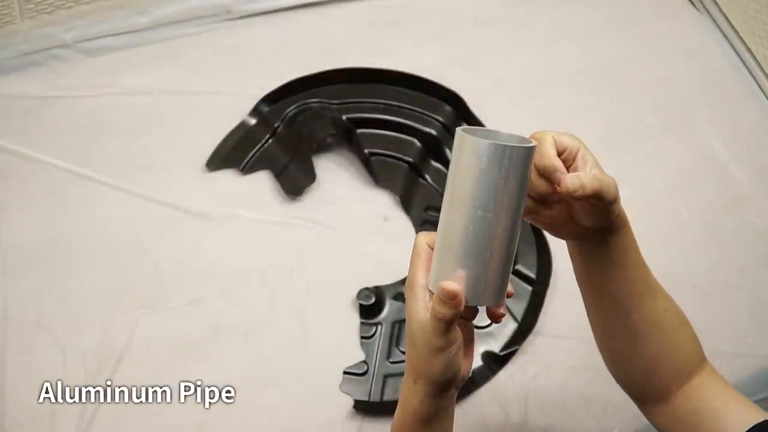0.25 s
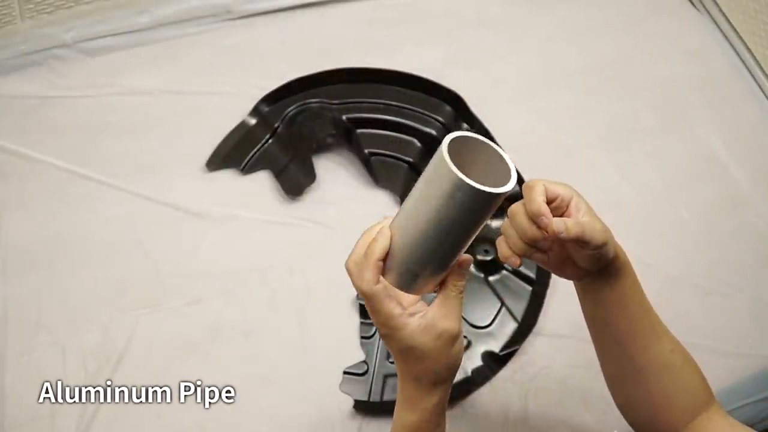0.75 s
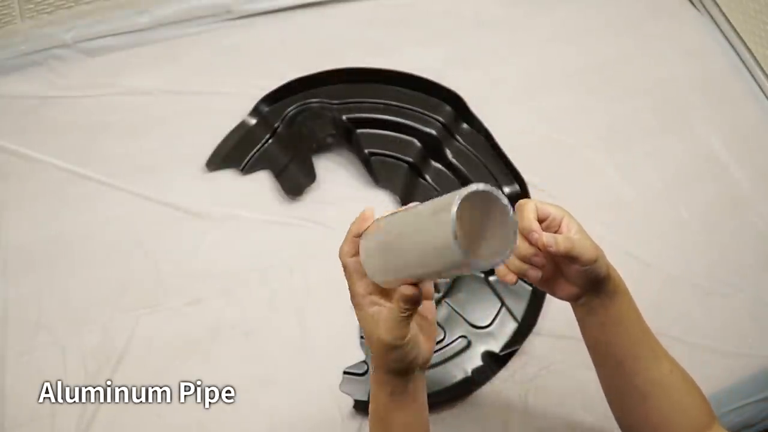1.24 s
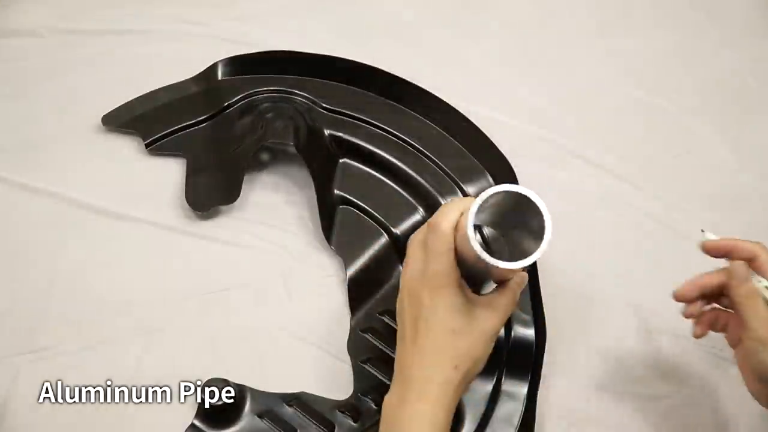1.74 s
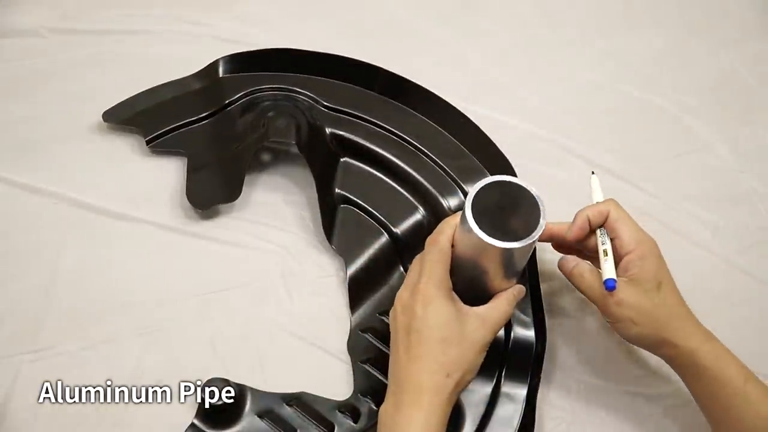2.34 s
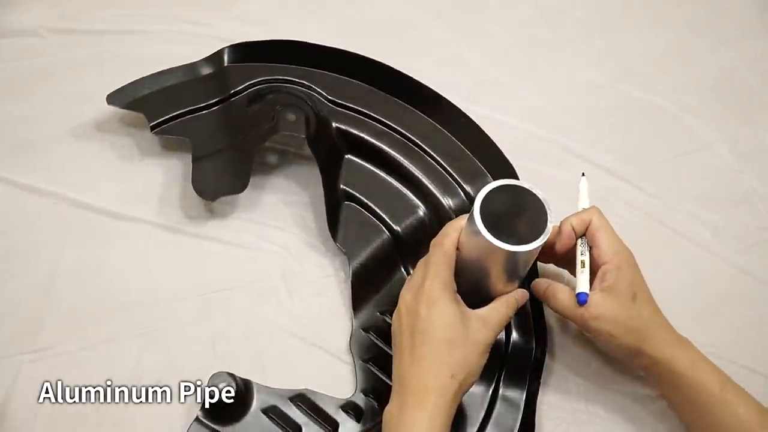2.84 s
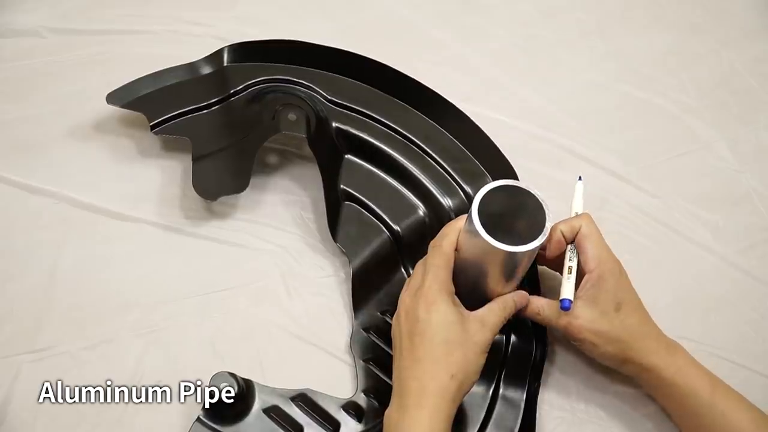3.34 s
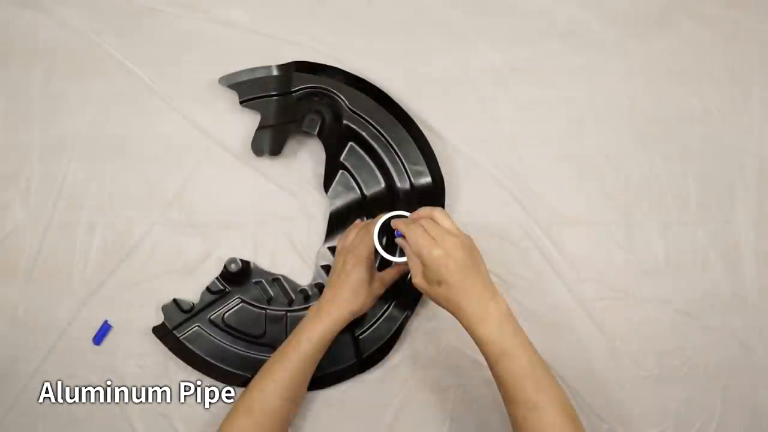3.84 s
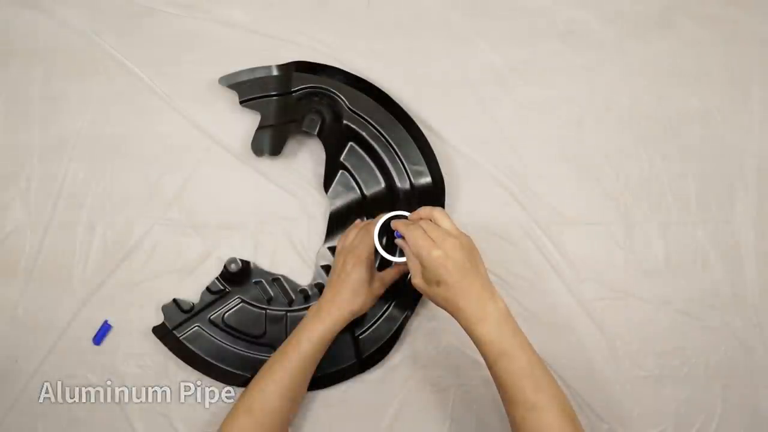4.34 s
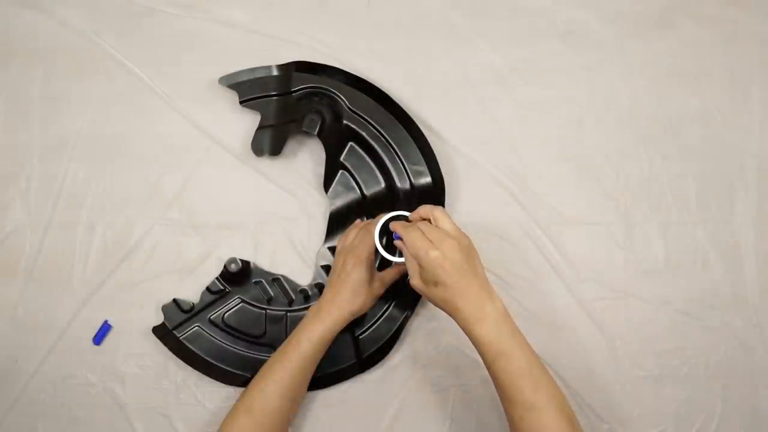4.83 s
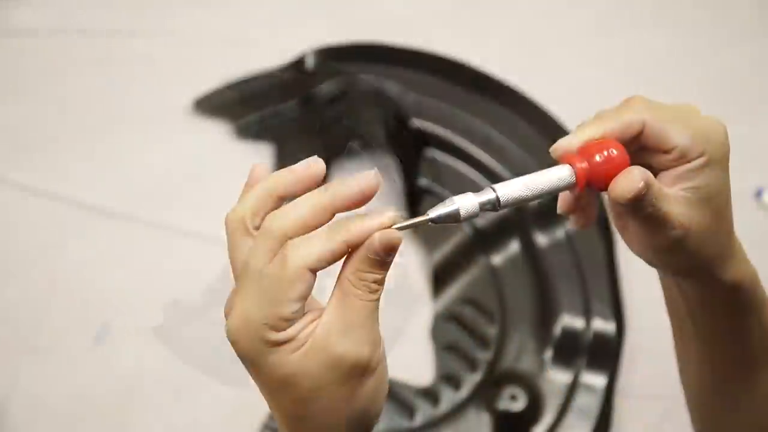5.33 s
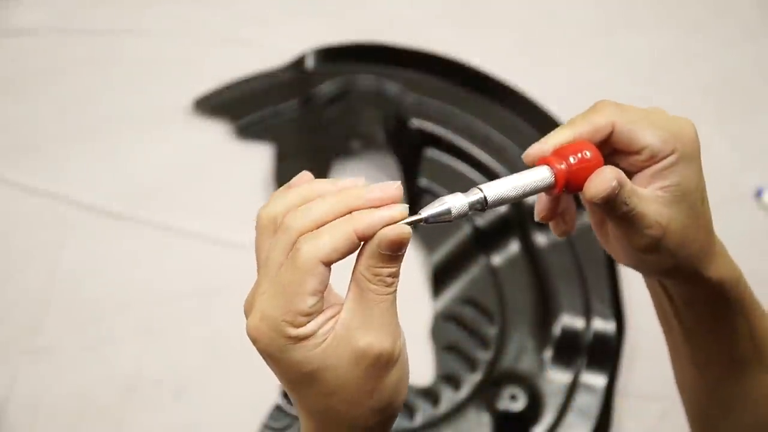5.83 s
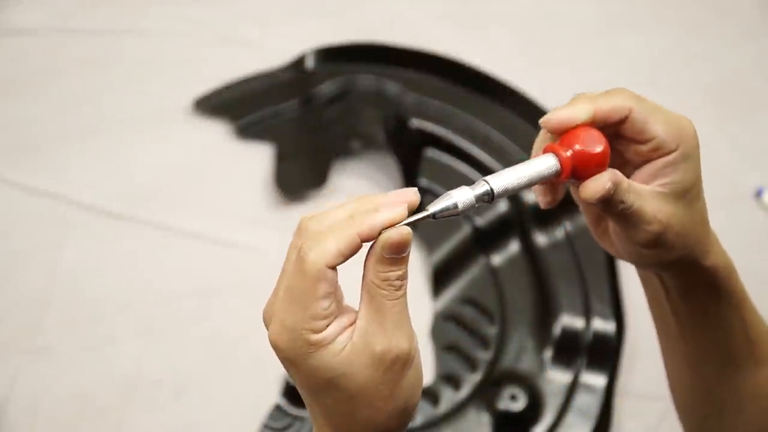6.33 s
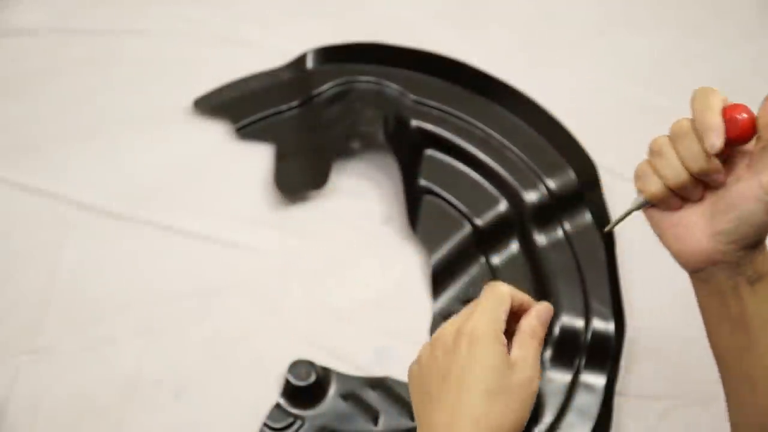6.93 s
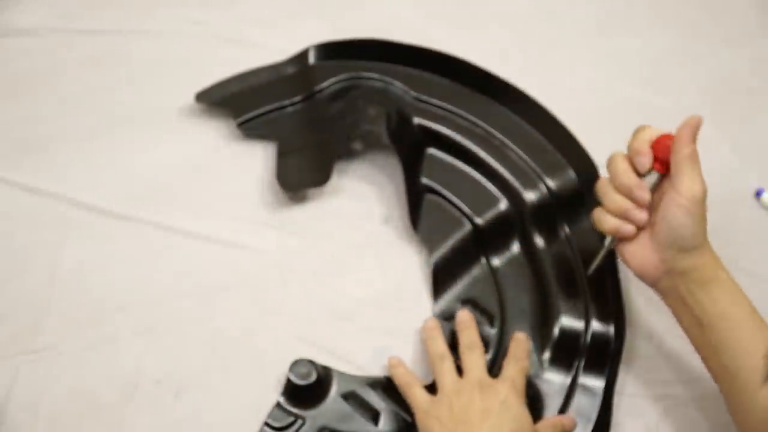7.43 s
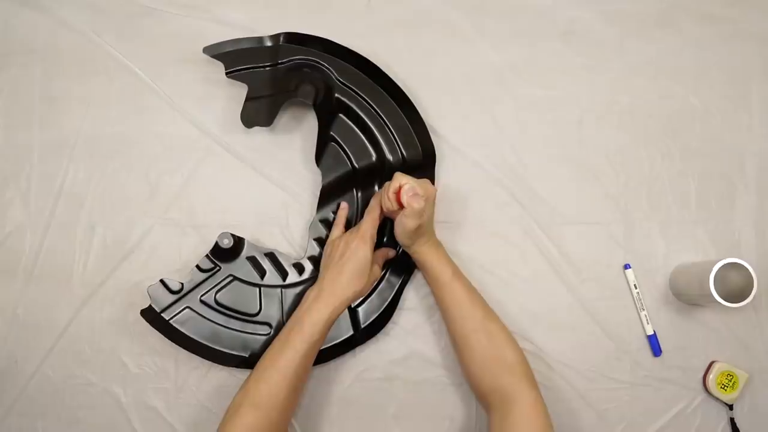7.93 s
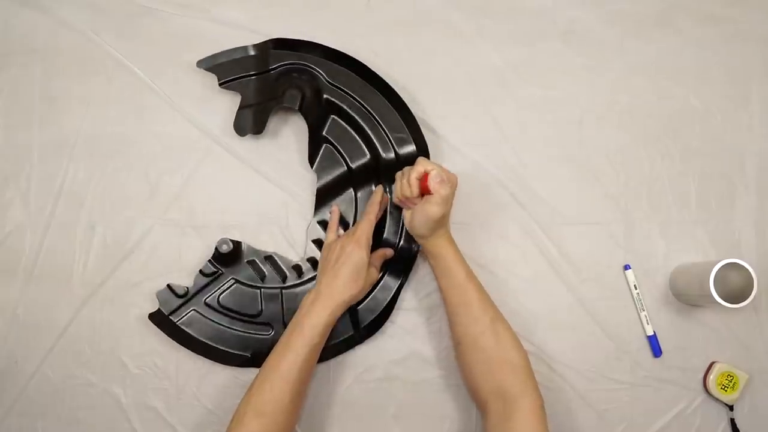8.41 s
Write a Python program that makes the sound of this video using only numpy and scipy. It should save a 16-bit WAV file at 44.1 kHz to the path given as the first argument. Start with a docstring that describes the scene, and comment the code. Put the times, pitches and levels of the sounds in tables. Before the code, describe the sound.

Quiet room: faint pipe tap, ringing knocks on a thin metal plate, crisp steel clicks, then one overloading bang with singing spring and clacks.

```python
"""A fingernail taps an aluminium pipe in a small, quiet room; the pipe is set down on a sheet-metal brake shield on a
cloth-covered table and shuffled into place. An automatic centre punch clicks in the fingers, is set on the shield and
fires with an overloading snap; its spring sings and the tool clacks back as the shield rocks. Struck bodies are sums
of decaying modes, impacts are shaped noise bursts, and friction is noise that keeps modes singing."""
import sys
import numpy as np
from scipy import signal
from scipy.fft import rfft, irfft
from scipy.io import wavfile
from scipy.ndimage import uniform_filter1d

SR = 44100
rng = np.random.default_rng(int(sys.argv[2]) if len(sys.argv) > 2 else 0)


def inscribe(sig):
    """Save sig as 16-bit PCM at rate SR to the path in sys.argv[1].

    A 1-D sig is mono; a 2-D sig holds one channel per row.
    Samples are clipped to [-1, 1] before scaling.
    """
    pcm = np.round(np.clip(np.atleast_2d(sig).T, -1, 1) * 32767)
    wavfile.write(sys.argv[1], SR, pcm.astype(np.int16))


N = 382347
TIME = np.arange(N) / SR
AGE = np.arange(SR) / SR  # s since a blow
OPPOSITE = np.array([[1], [-1]])  # signs of a difference between left and right
SHIELD_PAN_DB = -3.5  # left minus right

# modes of the hand-held pipe before the hand's damping: f/Hz, level/dB, T60/s
PIPE_MODES = [(3200, -0.5, .33), (3420, -3, .38), (7680, -14.5, 0.24), (9040, -7, .17)]
# knocks of the pipe and other objects on the shield:
# t/s, level/dB, contact bandwidth f/Hz, T60/s of the extra damping by hand and pipe
KNOCKS = [(2.0218, -11, 12000, 4.8), (2.047, -20, 8950, 1.9), (2.0973, -20, 6000, 8.9),
          (2.199, -29, 5600, 1.1), (2.269, -30.5, 8000, 1.1), (2.289, -19.5, 5960, 3.4),
          (2.309, -20.5, 4400, 6.7), (2.341, -30.5, 7750, 0.65), (2.387, -34, 3030, 1.2),
          (2.487, -48.5, 1980, .25), (7.4224, -31.5, 10950, 0.47), (7.677, -36, 5630, 0.84),
          (7.714, -39, 3110, 1.1), (7.859, -32.5, 1210, 1.3), (8.287, -25, 13000, 0.25),
          (8.465, -28, 2800, 2.6), (8.587, -28, 5000, 0.51)]
# clearest modes of the shield: f/Hz, level/dB
SHIELD_MODES = [(607, -7.5), (634, -5.5), (713, -10.5), (759, -1.5), (827, -4.5), (941, -9), (985, -2),
                (1066, -1.5), (1116, -6), (1167, -7), (1210, -2.5), (1317, -6), (1449, -3.5), (2014, -2.5),
                (2117, -4), (2178, -4.5), (2293, -8), (2355, -9.5), (2673, -3.5), (2863, -7.5),
                (3670, -9.5), (3866, -6), (4284, -9.5), (5601, -11), (5842, -13), (6170, -10.5),
                (6706, -12.5)]
# spectrum of the shield's crowd of lesser modes, level per Hz: f/Hz, level/dB
SHIELD_SPECTRUM = [(100, -17), (300, -12.5), (480, -1.5), (700, 4), (880, -3), (1200, -6), (1750, -4),
                   (2100, -5), (3000, -9.5), (4000, -12), (6500, -14), (8500, -19.5), (15000, -29)]
# spectrum of the padded table under the shield: f/Hz, level/dB
TABLE_SPECTRUM = [(22, -20), (52, -1), (105, -4.5), (190, -2), (270, -16), (500, -16), (900, -52)]
# modes of the punch's small steel parts: f/Hz, level/dB, T60/s
STEEL_MODES = [(2439, -48, 0.5), (4190, -49, 0.24), (5200, -48, .4), (5600, -49.5, 0.565), (7149, -40, .14),
               (9100, -27.5, 0.084), (9850, -24, .19)]
# spectrum of the hiss of sliding contact: f/Hz, level/dB
FRICTION_SPECTRUM = [(600, -31.5), (2000, -10.5), (5000, 3.5), (9500, -3), (12500, 0), (15000, -17)]


def undb(db):
    """Logarithmic scale: level in decibels to amplitude gain."""
    return 10 ** (np.asarray(db) / 20)


def unit(x):
    """Normalisation to a root-mean-square amplitude of 1."""
    return x / np.sqrt(np.mean(x ** 2))


def fade(t60):
    """Exponential free decay by 60 dB in t60 seconds, one second long."""
    return np.exp(-np.log(1000) * AGE / t60)


def pan(db):
    """Interaural level difference: left and right gains, db being left minus right."""
    return undb(np.array([[db], [-db]]) / 2)


def along(size, hz, values):
    """Spectral interpolation: values joined by straight lines over log frequency."""
    return np.interp(np.log(np.fft.rfftfreq(size, 1 / SR) + 1), np.log(hz), values)


def noise(spectrum, width, peaky_db=0, size=SR):
    """Spectral shaping of stereo noise, rms 1; width is side against mid, peaky_db scatters resonances."""
    # the middle range is the narrowest in stereo: f/Hz, factor on the side signal
    side_factor = [(150, 1.2), (1200, 0.28), (13000, 1.4)]
    hz, db = np.transpose(spectrum)
    mid, side = rfft(rng.standard_normal((2, size)))
    side = side * width * along(size, *np.transpose(side_factor))
    peaks = unit(np.convolve(rng.standard_normal(size // 2 + 1), np.hanning(90), "same"))
    gain = undb(along(size, hz, db) + peaky_db * peaks)
    return unit(irfft(np.array([mid + side, mid - side]) * gain, size))


def die_away(x, decays):
    """Frequency-dependent damping: every band of x fades at its own rate."""
    hz, t60s = np.transpose(decays)
    out = 0
    for band, t60 in zip(np.eye(len(hz)), t60s):
        out = out + irfft(rfft(x) * along(SR, hz, band), SR) * fade(t60)
    return out


def ring(modes, scatter_db=0.0, spread=0.36):
    """Modal superposition: each blow scatters the levels and sets phases apart at the two ears."""
    chance = rng.standard_normal((len(modes), 2))
    out = 0
    for (hz, db, t60), (weight, shift) in zip(modes, chance):
        wave = np.sin(2 * np.pi * hz * AGE + spread * shift * OPPOSITE)
        out = out + undb(db + scatter_db * weight) * fade(t60) * wave
    return np.sqrt(2) * out


def soften(x, hz):
    """Contact low-pass: a softer, longer contact leaves out the treble."""
    return signal.sosfilt(signal.butter(2, min(hz, .45 * SR), fs=SR, output="sos"), x)


def thin(x, hz):
    """Radiation high-pass: a small body radiates no bass."""
    return signal.sosfilt(signal.butter(4, hz, "high", fs=SR, output="sos"), x)


def flutter(hz):
    """Low-pass random modulation of rms 1, one second long."""
    return unit(soften(rng.standard_normal(2 * SR), hz)[SR:])


def stir(struck, size=SR):
    """Sustained excitation: noise convolved with a struck ring keeps it singing, rms 1."""
    drive = rng.standard_normal((1, size + SR))
    return unit(signal.fftconvolve(struck, drive, axes=1)[:, SR:SR + size])


def add(out, s, x):
    """Linear superposition: mix x in from time s."""
    i = int(s * SR)
    out[:, i:i + x.shape[1]] += x[:, :N - i]


def background():
    """Stationary noise: still room air, and a swelling, wavering machine hum stronger on the left."""
    # spectrum of the room air: f/Hz, level/dB
    air_spectrum = [(25, -13), (62, 0), (81, -12), (121, -5.5), (213, -12), (250, -3), (286, -13),
                    (501, -14.5), (978, -25.5), (15000, -42)]
    hum_band = [(40, -68), (56.5, -24.0), (58.3, 3.0), (60, -22.5), (80, -69.0)]  # f/Hz, level/dB
    waver = unit(noise(hum_band, width=.2, size=N))
    steady = np.sqrt(2) * np.sin(2 * np.pi * 58.2 * TIME)
    swell = undb(np.interp(TIME, (4.98, 5.31), [-83, -58.5]))  # s, dB
    hum = swell * (steady + 0.24 * waver) * pan(db=12)
    return undb(-66.5) * noise(air_spectrum, width=0.89, size=N) + hum


def room_echo(direct):
    """Reverberation by convolution: a short noise tail whose treble dies sooner."""
    # reverberation time of the room: f/Hz, T60/s
    room_t60 = [(300, 0.46), (3000, 0.03), (10000, 0.024)]
    tail = noise([(100, -5.5), (3000, -7.0), (15000, -0.5)], width=1.0)
    echo = die_away(tail, room_t60) * (1 - fade(t60=0.05))
    echo = echo / np.sqrt(np.sum(echo ** 2) / 2)
    return undb(-20.5) * signal.fftconvolve(direct, echo, axes=1)[:, :N]


def slides(table, modes, hiss_db):
    """Friction excitation: short finger slides, grainy with tiny catches that stir nearby modes."""
    stir_db_per_octave = 37.5  # modes away from the centre pitch are stirred less
    out = np.zeros((2, N))
    for s, length, db, centre_hz in table:
        swell = np.hanning(int(length * SR))
        stirred = [(hz, mode_db - stir_db_per_octave * abs(np.log2(hz / centre_hz)), t60)
                   for hz, mode_db, t60 in modes]
        hiss = noise(FRICTION_SPECTRUM, width=0.39, peaky_db=3.5) * unit(undb(3.0 * flutter(hz=151.4)))
        friction = unit(undb(hiss_db) * hiss + stir(ring(stirred) * fade(t60=0.092)))
        add(out, s - length / 2, undb(db) * swell * friction[:, :len(swell)])
    return out * pan(db=-3.0)


def dragging():
    """Friction-driven resonance: the rim creeps over the sheet with a catching hiss and wavering modes."""
    # pressure of the rim as the pipe is shifted: t/s, level/dB
    drag_path = [(2.4, -73), (2.72, -76), (2.82, -63.5), (2.95, -87), (3.46, -74.5), (3.54, -67),
                 (3.59, -77), (3.66, -54.5), (3.73, -90)]
    # resonances that the rim keeps singing: f/Hz, level/dB, T60/s
    drag_modes = [(1977, 4, 0.026), (3766, -1, 0.023), (4590, -5, .02), (6347, -8, .025)]
    out, size = np.zeros((2, N)), 2 * SR
    times, db = np.transpose(drag_path)
    pressure = np.interp(times[0] + TIME[:size], times, undb(db), right=0)

    def waver(hz):
        """Low-pass random modulation of rms 1, as long as the drag's noise."""
        return unit(soften(rng.standard_normal(size), hz))

    singing = 0
    for mode in drag_modes:
        singing = singing + undb(mode[1] + 5.9 * waver(hz=7)) * stir(ring([mode]), size=size)
    hiss = noise(FRICTION_SPECTRUM, width=0.47, peaky_db=2.5, size=size)
    friction = unit(singing) + undb(-4.0) * hiss
    add(out, times[0], pressure * unit(friction * undb(2.7 * waver(hz=40))))
    return out * pan(SHIELD_PAN_DB)


def squeaks():
    """Stick-slip oscillation: thin, wavering tones that swell and fade."""
    # metal sticking and slipping: start t/s, length t/s, start f/Hz, end f/Hz, level/dB
    stick_slips = [(2.377, 0.38, 11950, 11200, -73.5), (3.554, 0.36, 13000, 13000, -77),
                   (7.756, 0.07, 8400, 9350, -57.5)]
    out = np.zeros((2, N))
    for s, length, start_hz, end_hz, db in stick_slips:
        swell = np.hanning(int(length * SR))
        waver = unit(uniform_filter1d(rng.standard_normal(SR), size=150))[:len(swell)]
        hz = np.linspace(start_hz, end_hz, len(swell)) * (1 + .012 * waver)
        tone = np.sin(2 * np.pi * np.cumsum(hz) / SR)
        add(out, s, undb(db) * swell * tone * pan(SHIELD_PAN_DB))
    return out


def patch(hz, octaves):
    """Local resonance: noise in one bell-shaped patch of the sheet's spectrum, rms 1."""
    steps = np.linspace(-4, 4, 17)
    bell = np.transpose([hz * 2 ** (steps * octaves), -4.3 * steps ** 2])
    return noise(bell, width=0.32, peaky_db=2.5)


def scuffs():
    """Friction noise: short, grainy scrapes of the point, each stirring its own patch of resonances."""
    # the point scuffing over the shield: middle t/s, length t/s, level/dB, centre f/Hz, width/octaves
    scrapes = [(7.745, 0.11, -60, 1852, 0.43), (7.86, 0.19, -52, 5740, 0.94)]
    out = np.zeros((2, N))
    for s, length, db, hz, octaves in scrapes:
        swell = np.hanning(int(length * SR))
        friction = patch(hz, octaves) * unit(undb(1.9 * flutter(hz=118)))
        add(out, s - length / 2, undb(db) * swell * friction[:, :len(swell)])
    return out * pan(SHIELD_PAN_DB)


def rattles():
    """Repeated impact: the unloaded point skips on the sheet in short, dry ticks."""
    # the loose point chattering on the sheet: t/s, level/dB, centre f/Hz
    skips = [(8.223, -32, 12140), (8.479, -35, 3570), (8.538, -34, 3800)]
    out = np.zeros((2, N))
    for s, db, hz in skips:
        add(out, s, undb(db) * patch(hz, octaves=0.32) * fade(t60=0.044))
    return out


def pipe():
    """Modal beating: a nail tick rings the pipe's close modes, damped by the hand to a rough, faint ring."""
    # spectrum of the nail's tick: f/Hz, level/dB
    nail_spectrum = [(330, -24), (580, -4), (1000, -9), (2000, 3), (4500, -2), (8000, -11.5), (15000, -15)]
    out = np.zeros((2, N))
    tick = undb(-4.0) * noise(nail_spectrum, width=0.083) * (fade(t60=0.02) + undb(-25.5) * fade(t60=0.17))
    struck = ring(PIPE_MODES, spread=.2) * fade(t60=0.085)
    rough = undb(-14.0) * stir(struck) * fade(t60=0.25)
    add(out, 0.0605, undb(-20) * (tick + struck + rough))
    return thin(out, hz=405) * pan(db=-4.0)


def settling():
    """Resonance and damping: the shield rings from the landing until the hand presses down, then the pipe rocks
    with soft, hollow bumps."""
    # the shield's strongest modes ringing from the pipe's landing: f/Hz, level/dB, T60/s
    landing_modes = [(988, -21, 0.94), (1066.3, -31.5, 0.89)]
    # the pipe rocking under the hand: t/s, level/dB, rise t/s
    bumps = [(2.68, -48, 0.13), (2.790, -42.5, 0.012), (2.846, -37.5, 0.032), (3.03, -51, 0.14),
             (3.218, -44.5, 0.0074), (3.232, -45, 0.011), (3.719, -44, 0.011)]
    # spectrum of the hollow bumps: f/Hz, level/dB
    hollow_spectrum = [(300, -25), (560, -9), (770, 8), (980, -4.5), (1200, 1), (1520, -5.5), (1750, -20),
                       (2020, -20.5), (2600, -24.5), (8000, -51)]
    pressed_s = 2.29
    out = np.zeros((2, N))
    add(out, KNOCKS[0][0], ring(landing_modes, spread=.2) * pan(db=-5))
    out = out * np.exp(-np.maximum(TIME - pressed_s, 0) / .04)
    for s, db, rise in bumps:
        envelope = fade(t60=0.097 + rise) * (1 - fade(rise))
        add(out, s, undb(db) * noise(hollow_spectrum, width=0.46) * envelope * pan(db=-8))
    return out


def thump():
    """Damped low-frequency response: the padded table answers a push with a swelling thump."""
    # decay of the table: f/Hz, T60/s
    table_t60 = [(55, 0.52), (180, 0.49), (500, 0.26)]
    return die_away(noise(TABLE_SPECTRUM, width=0.56), table_t60) * (1 - fade(t60=0.013)) * pan(db=1.5)


def shield_t60(hz):
    """Modal damping: the decay time of the shield's modes depends on their pitch."""
    # decay of the shield: f/Hz, T60/s
    decay_times = [(400, 0.13), (1100, 0.3), (3000, 0.19), (8000, 0.08)]
    points, t60s = np.transpose(decay_times)
    return np.interp(np.log(hz), np.log(points), t60s)


def sheet_ring():
    """Modal excitation: each blow weights the clearest modes anew and pushes each one up or down."""
    hz, db = np.transpose(SHIELD_MODES)
    weight, way, side = rng.standard_normal((len(hz), 3)).T
    waves = fade(shield_t60(hz)[:, None]) * np.sin(2 * np.pi * hz[:, None] * AGE)
    gains = undb(db + 2.0 * weight) * (np.sign(way) + 0.18 * side * OPPOSITE)
    return np.sqrt(2) * gains @ waves


def crowd(count):
    """Modal density: the shield's lesser modes, one row each, scattered in pitch."""
    place = (np.arange(count) + rng.random(count)) / count
    hz = 350 + 15000 * place ** 1.7
    points, db = np.transpose(SHIELD_SPECTRUM)
    gain = undb(np.interp(np.log(hz), np.log(points), db)) * hz ** (1 / 5)
    gain = gain * np.sqrt(2 / np.sum(gain ** 2))
    phase = 2 * np.pi * (hz[:, None] * AGE + rng.random((count, 1)))
    return gain[:, None] * fade(shield_t60(hz)[:, None]) * np.sin(phase)


def through_sheet(x):
    """Resonant filtering: noise made in the shield gathers at its modes, most at the strong ones; rms 1."""
    lift_db, width_hz = 12, 15
    hz = np.fft.rfftfreq(SR, 1 / SR)
    lift = np.max([undb(db / 2) / (1 + ((hz - mode) / width_hz) ** 2) for mode, db in SHIELD_MODES], axis=0)
    gain = undb(lift_db * lift)
    local_gain = np.sqrt(uniform_filter1d(gain ** 2, size=220))  # keeps the broad spectrum in place
    return unit(irfft(rfft(x) * gain / local_gain, SR))


def shield():
    """Impact excitation: each knock cracks and rings the sheet's modes; the table's thump swells after."""
    # the shield rocking on the table as the hand leans on it and lets go: t/s, level/dB
    thuds = [(3.27, -54), (7.423, -38), (7.858, -31), (8.47, -21.5), (8.494, -24), (8.588, -24)]
    # the thump grows with the knock (dB per dB) until the cloth is squashed flat
    loudest_thump_db, thump_slope, squash_db = -31, 0.65, -26
    out = np.zeros((2, N))
    lesser = crowd(count=220)  # the same modes for every knock
    for s, db, contact_hz, damping in KNOCKS:
        mid, side = rng.standard_normal((2, len(lesser)))
        clatter = (mid + 0.2 * side * OPPOSITE) @ lesser
        # the first, sharp touch of metal on metal
        tick = unit(thin(noise(SHIELD_SPECTRUM, width=.2), hz=1500)) * fade(t60=0.0034)
        contact = through_sheet(noise(SHIELD_SPECTRUM, width=0.3))
        crack = tick + contact * (fade(t60=0.03) + undb(-9.0) * fade(t60=0.11))
        # the free rim, clear of the cloth
        shimmer = thin(noise(SHIELD_SPECTRUM, width=.4, peaky_db=10.5), hz=2400) * fade(t60=0.12)
        sheet = undb(-0.5) * crack + undb(-3.5) * clatter + undb(-15.5) * shimmer + undb(-13.5) * sheet_ring()
        knock = soften(sheet * fade(damping), contact_hz) * pan(SHIELD_PAN_DB)
        thump_db = loudest_thump_db + thump_slope * min(db - squash_db, 0)
        add(out, s, undb(db) * knock + undb(thump_db) * thump())
    for s, db in thuds:
        add(out, s, undb(db) * thump())
    return out


def clicks():
    """Impact of small bodies: steel contacts crack, chatter briefly and ring faintly in the fingers."""
    # steel parts of the punch clicking together: t/s, level/dB, contact bandwidth f/Hz, ring level/dB
    contacts = [(5.144, -41.5, 6000, -6.5), (5.406, -35.5, 5300, -14), (5.644, -14, 14100, -13),
                (5.805, -28, 5900, -13), (5.9044, -15.5, 14900, -15), (6.042, -26.5, 10600, -21.5),
                (6.1011, -34, 13200, -6), (6.1206, -16.5, 15000, -10.5)]
    # spectrum of the cracks: f/Hz, level/dB
    steel_spectrum = [(700, -76), (1700, -20.5), (3100, 1.5), (3900, -10.5), (5200, 9), (6100, -7.5),
                      (7200, 4), (8700, 1.5), (9800, 11.5), (11200, -8), (15000, -6.5)]
    out = np.zeros((2, N))
    envelope = fade(t60=0.01) + undb(-19.5) * fade(t60=0.066) + undb(-30.0) * fade(t60=0.25)
    for s, db, contact_hz, ring_db in contacts:
        crack = noise(steel_spectrum, width=0.35, peaky_db=6.5) * envelope
        struck = undb(ring_db) * ring(STEEL_MODES, scatter_db=12.0)
        add(out, s, undb(db) * soften(crack + struck, contact_hz))
    return thin(out, hz=2000) * pan(db=-2.0)


def spring(fired_s):
    """Modal energy exchange: modes swell in turn, flutter and fade, bending upward as the load comes off."""
    # modes of the punch's spring and barrel: f/Hz, level/dB, loudest at t/s, T60/s
    spring_modes = [(1660, -29, 8.10, 0.41), (3710, -33.5, 8.15, 0.43), (4410, -36.5, 8.14, 0.46),
                    (6150, -30, 8.15, 0.34), (6340, -39.5, 8.23, 1), (7778, -37, 8.10, 0.28),
                    (7760, -34, 8.245, 0.3)]
    swell_db_per_s, flutter_db = 87, 3
    t = fired_s + AGE
    # as the hand eases off (between these s), the pitch rises by this share
    bend = 0.017 * np.interp(t, (8.19, 8.28), [0, 1])
    seconds = np.cumsum(1 + bend) / SR
    out = 0
    for hz, db, peak_s, t60 in spring_modes:
        swell = undb(db + swell_db_per_s * np.minimum(t - peak_s, 0) + flutter_db * flutter(hz=22))
        decay = np.exp(-np.log(1000) * np.maximum(t - peak_s, 0) / t60)
        ear_shift = 0.18 * rng.standard_normal() * OPPOSITE
        phase = 2 * np.pi * hz * seconds + .35 * flutter(hz=25) + ear_shift
        out = out + np.sqrt(2) * swell * decay * np.sin(phase)
    return out


def punch():
    """Impulsive excitation: the hammer fires, the sheet buzzes under the point and the spring sings on."""
    # the punch firing and springing back:
    # t/s, level/dB, T60/s, rise t/s, power share of bright snap against dull clack (0-1)
    strokes = [(7.968, 5.5, 0.17, 0.027, 0.96), (8.204, -11.5, 0.11, 0.088, 0.02),
               (8.279, -15, 0.034, 0.0034, 0.01), (8.363, -24, 0.6, 0.14, 0.07),
               (8.3842, -7, 0.042, 0.0067, 0), (8.389, -14, 0.2, 0.016, 0.05),
               (8.417, -24, 0.3, 0.0031, 0.98)]
    # spectra of the bright snap and the dull clack: f/Hz, level/dB
    snap_spectrum = [(60, -6), (180, -9), (290, -17.5), (480, -0.5), (1000, -3), (1600, 0.5), (2400, 0.5),
                     (3200, -2), (4500, -8.5), (6300, -5), (8500, -14), (11000, -10), (15500, -21.5)]
    clack_spectrum = [(200, -20), (600, -26.5), (1000, -7), (1350, 2.5), (1800, -8), (2300, -4),
                      (2700, -27), (12000, -30.5)]
    # lowest modes of the table top: f/Hz, level/dB, T60/s
    boom_modes = [(52.5, -22, 1.7), (59.55, -27.5, 1.2)]
    # the note set ringing as the point slips in its dent: f/Hz, level/dB, T60/s
    slip_modes = [(1580, -1, 0.047), (1590, -10.5, 0.25)]
    out = np.zeros((2, N))
    for s, db, t60, rise, bright in strokes:
        bright = np.clip(bright, 0, 1)
        snap = np.sqrt(bright) * noise(snap_spectrum, width=0.45, peaky_db=2.5)
        clack = np.sqrt(1 - bright) * noise(clack_spectrum, width=0.24)
        add(out, s, undb(db) * through_sheet(snap + clack) * fade(t60) * (1 - fade(rise)))
    fired_s = strokes[0][0]
    # the buzz swells to a peak, then dies away
    buzz_peak_s, buzz_db, rise_db_per_s, fall_db_per_s = 8.103, -18, 207, 149
    past_peak = fired_s + AGE - buzz_peak_s
    buzz = undb(buzz_db + np.minimum(rise_db_per_s * past_peak, -fall_db_per_s * past_peak))
    chatter = through_sheet(noise(snap_spectrum, width=0.45, peaky_db=3.0)) * unit(undb(2.0 * flutter(hz=150)))
    sheet = undb(-1.5) * chatter * buzz + undb(-22) * sheet_ring()
    rumble = undb(-28.0) * noise(TABLE_SPECTRUM, width=0.53) * fade(t60=1.0)
    table = rumble + ring(boom_modes, spread=1.0)
    add(out, fired_s, (sheet + table) * (1 - fade(t60=0.059)) + spring(fired_s))
    add(out, 8.127, ring(slip_modes, spread=0.068) * (1 - fade(t60=0.034)))
    latch = noise([(1500, -16), (4000, 0.5), (6500, 3.0), (11000, 7.0), (15500, -10)], width=0.23)
    add(out, 8.4155, undb(-9.5) * latch * fade(t60=0.06))
    return out * pan(db=-1.5)


def scene():
    """Superposition of all sources and the room's echo; the sound drops out briefly just before the snap."""
    # fingers sliding on the punch: middle t/s, length t/s, level/dB, f/Hz at which it is stirred most
    punch_rubs = [(5.363, 0.056, -62, 5000), (5.635, 0.049, -46, 9580), (5.788, 0.071, -56.5, 5460),
                  (5.897, 0.052, -47.5, 9500), (6.019, 0.07, -53, 5600), (6.28, 0.066, -62.5, 4220)]
    # fingers sliding on the pipe: the same columns
    pipe_rubs = [(0.71, 0.078, -79, 6500), (0.995, 0.04, -77.5, 5600), (1.21, 0.18, -78.5, 6200),
                 (1.53, 0.23, -73, 8400), (1.615, .17, -77, 3700)]
    fingers = slides(punch_rubs, STEEL_MODES, hiss_db=0.5) + slides(pipe_rubs, PIPE_MODES, hiss_db=-13.0)
    friction = fingers + dragging() + scuffs() + squeaks()
    direct = friction + rattles() + pipe() + settling() + shield() + clicks() + punch()
    outside_pause = (TIME < 7.908) | (TIME > 7.962)  # s
    sounding = uniform_filter1d(1. * outside_pause, size=200)
    return (direct + room_echo(direct) + background()) * sounding


def record(dry):
    """Saturation and band limiting: the snap overloads the recorder; the top is cut."""
    clipped = dry / (1 + np.abs(dry) ** 6) ** (1 / 6)
    return signal.sosfilt(signal.ellip(8, .2, 70, 15800, fs=SR, output="sos"), clipped)


dry = scene()
out = record(dry)
inscribe(out)
```